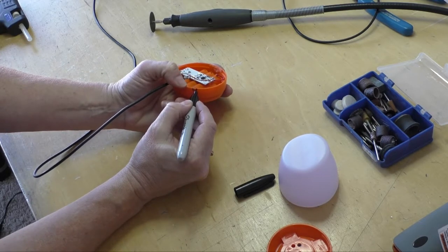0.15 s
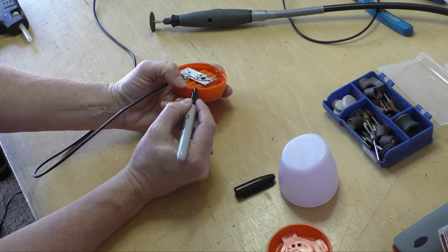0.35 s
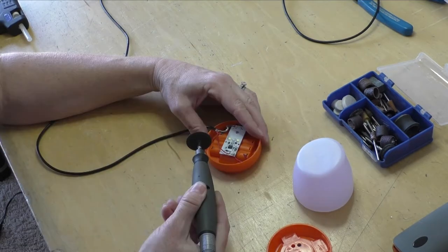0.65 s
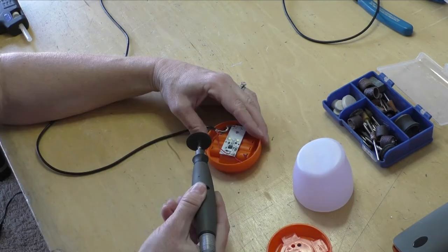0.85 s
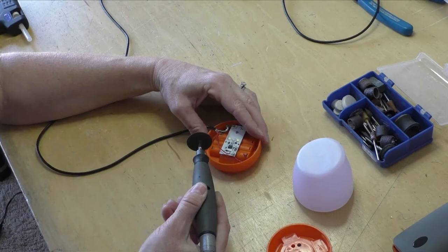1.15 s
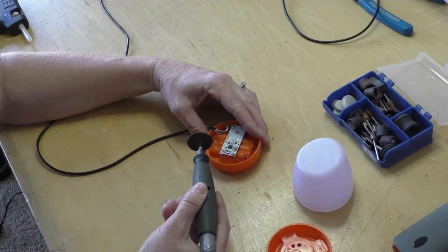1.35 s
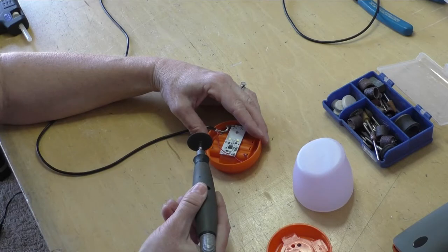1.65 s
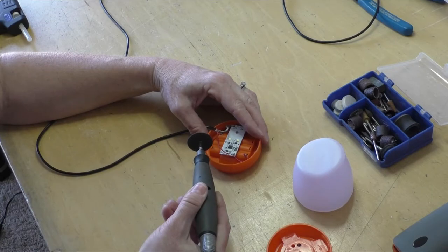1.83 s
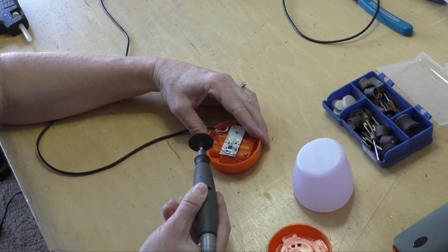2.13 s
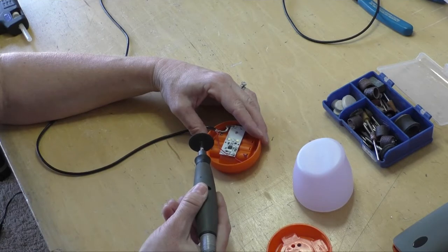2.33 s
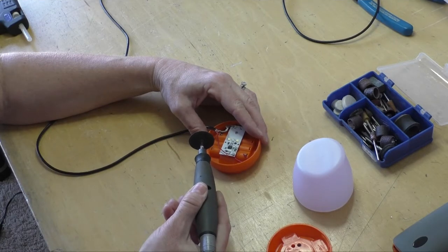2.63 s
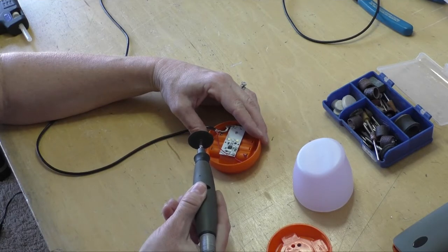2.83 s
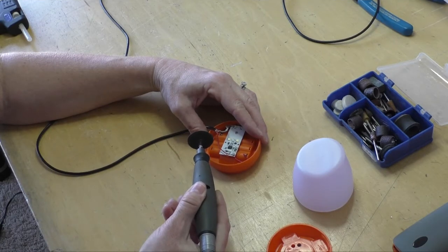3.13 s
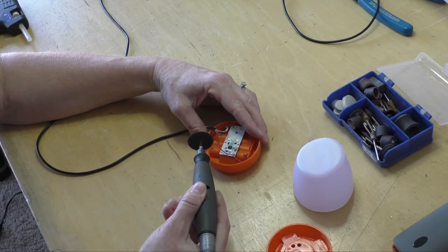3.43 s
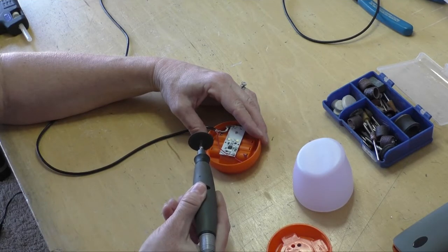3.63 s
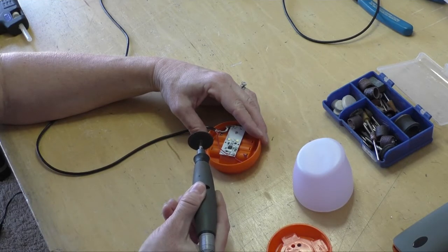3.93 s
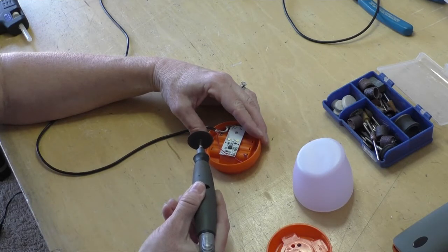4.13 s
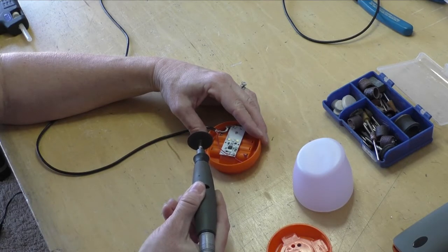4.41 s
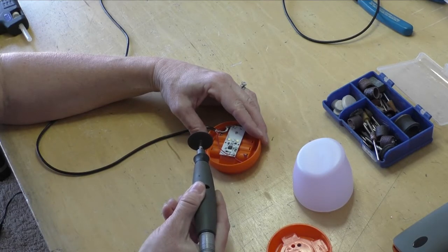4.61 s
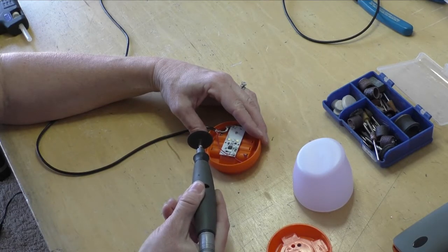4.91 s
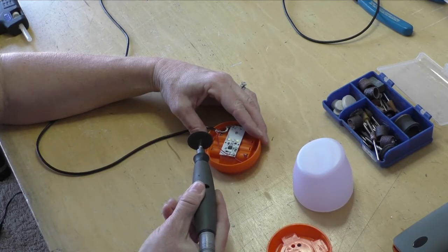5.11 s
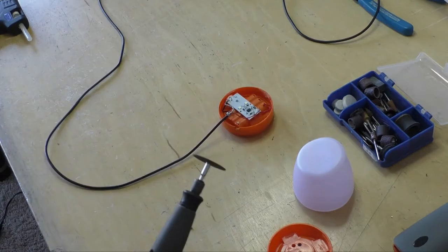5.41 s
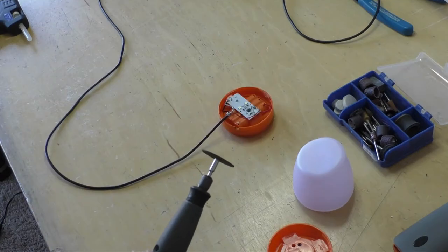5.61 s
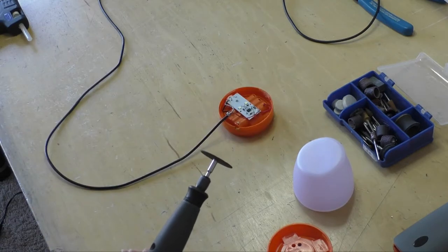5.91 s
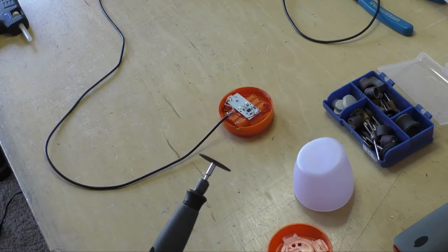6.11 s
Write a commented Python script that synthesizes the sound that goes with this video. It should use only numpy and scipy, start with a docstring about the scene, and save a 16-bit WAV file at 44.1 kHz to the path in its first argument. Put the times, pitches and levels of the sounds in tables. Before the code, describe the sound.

Heard close in a small, fairly dry workshop: low appliance hum and a faint felt-tip scrape, then a sudden jump to a rattling hand tool. Brief zips lead into a long, bright, rasping plastic cut dropping in pitch, followed by three short shrill bursts with the free-running whir between them. Finally a nearer buzzy motor whine runs briefly, is switched off, and falls quickly away.

```python
"""Rotary tool on a plastic bowl

A workbench in three abrupt sections: a marker drags over a plastic bowl in a humming room; a flex-shaft tool
runs free, touches the bowl briefly and takes four long cuts; its motor is heard closer, then switched off.
The off-centre disc scrapes once a turn with nearly repeating roughness, ringing modes of bowl and disc.
The tool is shaft-locked rattle, mains buzz and whine; the room is rumble, hiss and wavering hum lines."""
import sys
import numpy as np
from scipy import signal
from scipy.fft import rfft, irfft
from scipy.io import wavfile
from scipy.ndimage import uniform_filter1d, map_coordinates

SR = 44100
rng = np.random.default_rng(int(sys.argv[2]) if len(sys.argv) > 2 else 0)


def transcribe(u):
    """Save the signal u as a 16-bit wav file named by the first command-line argument.

    u: samples, shape (n,) or (channels, n), limited to [-1, 1]; the rate is SR.
    q: integer samples, one column per channel.
    """
    v = np.clip(np.atleast_2d(u).T, -1, 1)
    q = np.round(v * 32767).astype(np.int16)
    wavfile.write(sys.argv[1], SR, q)


N = 276066
TIME_S = np.arange(N) / SR
MAINS_HZ = 60.0
FREE_HZ, FREE_WAVER_HZ = 179.9, 0.4  # turns per second without load, and their waver
OFF_S, COAST_PER_S = 5.928, 3.1  # switch-off, and decay rate of the speed after it

# Parts of bowl and disc, from whole bowl, floor, low wall, lower and upper mid wall, high wall, rim,
# disc edge to disc: touch_db (share on first touch), sunk_db (share once sunk in),
# load_db (gain per third of the free speed lost)
PART_SHARES = [(-57, -59, 3), (-52, -50, -2), (-50, -47.5, 1.5), (-39, -43, -1), (-52, -41.5, 1.5),
               (-52.5, -45, 3.5), (-41.5, -41, -3.5), (-39.5, -43.5, -1.5), (-41, -46, -3)]
# Extra level of the treble ring: time_s, disc_edge_db, disc_db
TREBLE_RING = [(.75, 1.5, 0), (1.05, 3, 0), (1.28, -1.5, -3), (1.48, 1.5, 2), (1.7, 1.5, 7.5),
               (2.14, 2.5, -3), (2.31, 2, 6.5), (2.49, 3.5, -3), (3.45, 9.5, 6), (3.54, 1, -4),
               (3.8, -3, -4), (3.91, 6, 11), (4.43, 3, -3), (4.57, 1, -2), (4.68, 1, -1), (5.08, 0, -5),
               (5.2, -3, -7), (5.4, -2, -6)]
# The disc just brushing the bowl: time_s, level_db
GRAZES = [(3.1, -57), (3.198, -53), (3.3, -62), (3.386, -50), (4.007, -62), (4.039, -61), (4.064, -56),
          (4.12, -63), (4.325, -56), (4.835, -62), (4.905, -56)]
SHARE_WAVER_DB = 1.5


def cut(turns):
    """The high side of the disc scrapes once a turn; torn chips add fresh grit, mostly in the treble."""
    bite, depth = contact()
    # The more the shaft is dragged down, the more the plastic tears at random
    speed_hz = np.gradient(turns) * SR
    load = np.clip(1 - speed_hz / FREE_HZ, 0, 1 / 4)
    tearing = undb(-17 + 45 * load) * rng.standard_normal(N)
    worn = steady(repeating(turns, 30.0)) + tearing
    gritty = worn + undb(-15) * rng.standard_normal(N)
    body_band = signal.butter(2, [520.0, 7000.0], "band", fs=SR, output="sos")
    treble_band = signal.butter(2, 7000.0, "high", fs=SR, output="sos")
    dull = signal.sosfilt(body_band, worn)
    bright = signal.sosfilt(treble_band, gritty)

    # The bowl feels the disc all round; the thin disc sings mostly on its high side
    dull_scrape = dull * (undb(-3) + arc(turns, 3.4))
    bright_scrape = bright * (undb(-14) + arc(turns - 0.05, 3.2))
    parts = bowl(dull_scrape + bright_scrape)

    shares = []
    for touch_db, sunk_db, load_db in PART_SHARES:
        share_db = touch_db + (sunk_db - touch_db) * depth + 3 * load * load_db
        shares.append(undb(share_db + SHARE_WAVER_DB * walk(7)))
    shares = np.array(shares)
    shares[-2:] *= undb([curve(TREBLE_RING, column) for column in (1, 2)])
    shares /= np.sqrt((shares ** 2).sum(0))  # total power stays 1
    scrape = sum(steady(part, 0.12) * share for part, share in zip(parts, shares))

    graze = sum(undb(db) * np.exp(-((TIME_S - s) / 0.0051) ** 2) for s, db in GRAZES)
    brushed = steady(parts[5:8].sum(0))  # high wall, rim and disc edge
    return scrape * bite + brushed * graze


# Each contact of disc and bowl: start_s (full bite), end_s (let-off), rise_db_per_s, fall_db_per_s,
# sink_db (how far tool and room drop), sink_in_s (time constant of the disc sinking in)
CONTACTS = [(0.78, 0.782, 295, 201, 2, .4), (0.859, 0.857, 1500, 1600, 5, 0.27),
            (.98, 0.98, 496, 903, -9, 0.51), (1.02, 1.018, 1100, 1800, 0, .4),
            (1.051, 2.527, 1800, 650, 20.5, 0.21), (3.455, 3.926, 801, 900, 16.5, 0.013),
            (4.386, 4.709, 1500, 448, 16, 0.038), (5.07, 5.408, 1800, 900, 17, 0.056)]
# How hard the disc is pressed in: time_s, bite_db
PRESS = [(.78, -32), (.86, -37), (.98, -34.5), (1.02, -34.5), (1.048, -32.5), (1.144, -39.5), (1.17, -36.5),
         (1.49, -34), (1.73, -37), (1.78, -34), (2.14, -33), (2.21, -35.5), (2.4, -33), (2.45, -34),
         (2.49, -34), (2.52, -38.5), (3.47, -32.5), (3.58, -36), (3.66, -34.5), (3.92, -38), (4.39, -35),
         (4.53, -35), (4.63, -32.5), (4.71, -36), (5.08, -35), (5.14, -36.5), (5.23, -32.5), (5.4, -35.5)]
PRESS_WAVER_DB = 0.36


def contact():
    """Gain of the bite from hand pressure, and how deep the disc sits (0-1)."""
    gain, depth = 0, np.zeros(N)
    for start, end, rise, fall, _, sink_in_s in CONTACTS:
        # Pressure inside the contact, straight dB slopes on both sides
        press_db = np.interp(np.clip(TIME_S, start, end), *np.transpose(PRESS))
        slope_db = rise * np.clip(start - TIME_S, 0, 1) + fall * np.clip(TIME_S - end, 0, 1)
        gain = gain + undb(press_db - slope_db)
        sinking_in = 1 - np.exp(-np.clip(TIME_S - start, 0, None) / sink_in_s)
        depth = np.where(TIME_S > start, sinking_in, depth * (TIME_S < start - 0.05))
    return gain * undb(PRESS_WAVER_DB * walk(14)) * by_section((0, 1, 0)), depth


# Modes of bowl and disc: centre_hz, width_hz (of each of two filter passes), level_db
BOWL_MODES = [(576, 366, -10.5), (734, 176, -10.5), (1136, 132, 1.5), (1548, 180, 4), (1850, 72, 5.5),
              (2537, 444, -3), (3143, 440, -3), (3742, 390, 6), (4652, 270, 3.5), (5230, 60, -5.5),
              (6176, 880, -2), (6780, 180, -4.5), (7670, 220, -3), (8230, 530, 0.5), (9070, 320, 1.5),
              (10010, 1080, -5), (10950, 70, -2), (11960, 390, -9.5), (12700, 90, -5), (13300, 510, -15),
              (14300, 1100, -1), (15100, 610, -6.5)]
# Upper limits of all parts but the last: top_hz
PART_TOPS = (900, 2100, 2900, 3500, 4250, 5400, 7300, 13000)


def bowl(x):
    """The ringing modes, summed part by part from the whole bowl up to the disc."""
    parts = np.zeros((len(PART_TOPS) + 1, len(x)))
    for hz, width_hz, db in BOWL_MODES:
        parts[np.searchsorted(PART_TOPS, hz)] += undb(db) * ring(x, hz, width_hz)
    return parts


def repeating(turns, memory, count=256):
    """Roughness fixed around the shaft, wearing into a new pattern over `memory` turns."""
    keep = np.exp(-1 / memory)
    # One row per turn, each point leaning on the same point of the turn before
    rows = signal.lfilter([1], [1, -keep], rng.standard_normal((1400, count)), axis=0).ravel()
    return map_coordinates(rows, [(turns + 200) * count], order=3)  # skip the build-up


def arc(turns, sharp):
    """A bump once per turn, peaking at 1."""
    return np.exp(sharp * (np.cos(2 * np.pi * turns) - 1))


# Shaft speed in the first two sections: time_s, speed_hz (turns per second)
SHAFT_SPEED = [(0.58, 174), (0.85, 177.4), (1.0, 176.3), (1.22, 178.7), (1.45, 173.5), (1.86, 161.2),
               (2.35, 145), (2.5, 140.9), (2.64, 154.2), (2.89, 163), (3.15, 171.2), (3.47, 173.7),
               (3.73, 165.8), (3.88, 163.5), (4.09, 169.2), (4.35, 174.7), (4.45, 173.1), (4.56, 169.3),
               (4.72, 161.2), (4.99, 170.3), (5.1, 171.5), (5.22, 168.8), (5.41, 161.8)]


def shaft():
    """Turns of the shaft so far: the drawn speed, then free running that decays after switch-off."""
    free_hz = FREE_HZ + FREE_WAVER_HZ * walk(5)
    coasting_hz = free_hz * np.exp(-COAST_PER_S * np.clip(TIME_S - OFF_S, 0, None))
    return np.cumsum(np.where(TIME_S < SECTION_STARTS[1], curve(SHAFT_SPEED), coasting_hz)) / SR


# Tool level by section: level_db
TOOL_LEVELS = (-99, -40, -41.5)
FADE_DB, FADE_POWER = 108, 1.6  # fall one second after switch-off, and how late it comes


def tool(turns, sunk_db):
    """Shaft-locked rattle and mains buzz, with bench wobble in section two and motor whine in three."""
    half_cycles = 2 * MAINS_HZ * TIME_S
    powered = np.clip((OFF_S - TIME_S) / 0.021, 0, 1)
    near_motor = TIME_S > SECTION_STARTS[1]
    on_bench = (TIME_S > SECTION_STARTS[0]) & (TIME_S < SECTION_STARTS[1])
    close = motor(turns, half_cycles, powered)
    hand = handpiece(turns, half_cycles)
    fade_db = FADE_DB * np.clip(TIME_S - OFF_S, 0, 1) ** FADE_POWER
    level_db = by_section(TOOL_LEVELS) - sunk_db - fade_db + 1.1 * walk(15)
    noise = np.where(TIME_S < SECTION_STARTS[1], steady(hand), steady(close)) * undb(level_db)
    whining = whine(turns, half_cycles) * powered * near_motor
    return noise + np.sqrt(2) * (whining + wobble(turns, sunk_db) * on_bench)


# Handpiece spectrum: frequency_hz, density_db (dB per Hz, relative)
HANDPIECE_COLOUR = [(120, -39), (300, -19.5), (550, -20.5), (1100, -9.5), (1600, -9.5), (2200, -2),
                    (2800, -2), (3150, -10.5), (4500, -13.5), (6200, -18), (7000, -22), (10000, -25),
                    (15800, -30.5)]


def handpiece(turns, half_cycles):
    """Handpiece and flex shaft rattle nearly alike each turn, swelling with each mains half-cycle."""
    rattle = steady(repeating(turns, 20.7)) + undb(2) * rng.standard_normal(N)
    return colour(rattle * (1 + 0.5 * arc(half_cycles, 3.1)), HANDPIECE_COLOUR)


# Motor spectrum: frequency_hz, density_db (dB per Hz, relative)
MOTOR_COLOUR = [(150, -42), (400, -19.5), (750, -15), (1050, -7), (1600, -6.5), (2200, -8), (2700, -3.5),
                (3750, -3), (4050, -8.5), (4600, -7.5), (5000, -15), (6200, -16), (10800, -18.5),
                (15800, -25)]
# Tones of the brushes over the segments: multiple of the shaft speed
BRUSH_TONES = (24, 32, 48, 64)


def motor(turns, half_cycles, powered):
    """Rattle buzzing with brush sparks; after power-off the brushes sing down through housing resonances."""
    rattle = steady(repeating(turns, 8.8))
    # Sparks differ from one half-cycle to the next
    spark_gain = undb(2.07 * rng.standard_normal(800))[half_cycles.astype(int)]
    spark = spark_gain * arc(half_cycles, 17.5)
    sing = sum(undb(-11 + 5 * walk(40)) * np.sin(2 * np.pi * k * turns) for k in BRUSH_TONES)
    sing = (ring(sing, 2950.0, 1710.0) + ring(sing, 4900.0, 700.0)) * (1 - powered)
    rough = rattle + undb(4.0) * rng.standard_normal(N)
    buzz = 1 + 0.68 * spark * (0.17 + 0.21 * powered)
    return colour(sing + rough * buzz, MOTOR_COLOUR)


# Commutator whine lines: shaft_multiple, sideband (steps of the mains half-cycle rate)
WHINE_LINES = [(16, -2), (16, -1), (16, 0), (16, 1), (16, 2), (16, 3), (8, 0), (9, 0), (64, 0), (72, 0),
               (80, 0)]
# Level of each whine line: level_db
WHINE_LEVELS = [-53, -57, -53, -48.5, -51, -51, -64, -63, -61, -72, -70]


def whine(turns, half_cycles):
    """Commutator tones at shaft multiples, with sidebands spaced by the mains half-cycle rate."""
    out = np.zeros(N)
    for (multiple, sideband), db in zip(WHINE_LINES, WHINE_LEVELS):
        cycles = multiple * turns + sideband * half_cycles + 1 / 4
        out += undb(db + 1.5 * walk(10)) * np.sin(2 * np.pi * cycles)
    return out


# The bench's answer to the shaft's unbalance: frequency_hz, level_db
BENCH_RESPONSE = [(140, -61), (157, -49.5), (175, -66.5), (290, -57), (320, -65.5), (350, -68), (425, -48),
                  (445, -52), (485, -61.5), (500, -66.5), (530, -74)]


def wobble(turns, sunk_db):
    """Shaft unbalance and its multiples, each as loud as the bench answers at that pitch."""
    out = np.zeros(N)
    for k in (1, 2, 3):
        pitch_hz = k * np.gradient(turns) * SR
        bench_db = np.interp(pitch_hz, *np.transpose(BENCH_RESPONSE))
        out += undb(bench_db - sunk_db + 2.3 * walk(12)) * np.sin(2 * np.pi * k * turns)
    return out


# Level of the marker stroke: time_s, level_db
MARKER_STROKE = [(.09, -75), (.11, -59.5), (.2, -58.5), (.235, -67), (.28, -57), (.325, -57), (.36, -51),
                 (.377, -41.5), (.392, -62), (.4, -70)]
# How the felt tip drives each part, whole bowl to disc: level_db
TIP_DRIVE = [-23, -13, -11, -3, 0, -8, 2, -2, -8]


def marker():
    """The felt tip drags in tiny slips that ring the bowl, then ticks as it lifts off."""
    slips = (rng.standard_normal(N) * undb(2.5 * walk(152.8)))[:SR]
    rung = steady(sum(steady(part) * undb(db) for part, db in zip(bowl(slips), TIP_DRIVE)))
    return np.pad(rung, (0, N - SR)) * undb(curve(MARKER_STROKE, out=-200))


# A hand shifting on the bench: start_s, level_db, pitch_hz
HAND_THUDS = [(3.42, -56, 85.7), (3.5, -64, 82), (3.64, -65, 89)]


def thuds():
    """Soft pushes into the bench top: low sines that swell and die in tens of milliseconds."""
    out = np.zeros(N)
    for start_s, db, hz in HAND_THUDS:
        t = np.clip(TIME_S - start_s, 0, None)
        out += undb(db) * np.sin(2 * np.pi * hz * t) * (t / 0.022) * np.exp(1 - t / 0.019)
    return out


# Room spectrum: frequency_hz, density_db (dB per Hz, relative)
ROOM_COLOUR = [(15, -40), (25, -12.5), (133, -4), (316, -14), (382, -13.5), (857, -21), (1510, -28),
               (1780, -27), (2200, -30.5), (3490, -31.5), (4330, -37.5), (6850, -40), (15800, -42)]
# Hum lines: pitch_hz, level_db (relative, lifted by 48 dB in the mix)
HUM_LINES = [(60, -48.5), (120, -47), (145.3, -63), (180, -58), (248, -59), (382, -62), (850, -62.5)]
# Room level by section: level_db
ROOM_LEVELS = (-41, -60.5, -65.5)


def room(sunk_db):
    """Appliance rumble with wavering hum lines over a faint hiss."""
    hum = np.zeros(N)
    for hz, db in HUM_LINES:
        hum += undb(db + 2 * walk(13)) * np.sin(2 * np.pi * (hz * TIME_S + rng.random()))
    rumble = steady(colour(rng.standard_normal(N), ROOM_COLOUR))
    return steady(rumble + undb(48.0) * hum) * undb(by_section(ROOM_LEVELS) - sunk_db)


SINK_S, CREEP_DB_PER_S = 0.11, 14.5  # time constant of the drop, and speed of the return


def sinking(count=200):
    """dB by which tool and room lie under their free level: drawn down in a cut, creeping up between."""
    times, sunk = np.arange(0, N / SR, 1 / count), [0.0]
    for s in times[1:]:
        pull = [row[4] for row in CONTACTS if row[0] <= s < row[1]]
        if pull:
            sunk.append(sunk[-1] + (pull[0] - sunk[-1]) / (1 + SINK_S * count))
        else:
            sunk.append(max(sunk[-1] - CREEP_DB_PER_S / count, 0))
    return curve(np.transpose([times, sunk])) * by_section((0, 1, 0))


# Where the second and third sections cut in: start_s
SECTION_STARTS = (.574, 5.415)


def by_section(values):
    """One value for each section, at every sample."""
    return np.array(values)[np.searchsorted(SECTION_STARTS, TIME_S)]


def undb(db):
    """Decibels to amplitude."""
    return 10 ** (np.asarray(db) / 20)


def curve(rows, column=1, out=None):
    """A table column at every sample, on straight lines between its times."""
    rows = np.array(rows)
    return np.interp(TIME_S, rows[:, 0], rows[:, column], left=out, right=out)


def steady(x, span_s=20):
    """Level x to an rms near 1 over a sliding span."""
    return x / np.sqrt(uniform_filter1d(x ** 2, int(span_s * SR), mode="reflect") + 1e-18)


def colour(x, points):
    """Shape the spectrum of x by (Hz, dB) points on a log frequency axis."""
    hz, db = np.transpose(points)
    bins_hz = np.arange(N // 2 + 1) * SR / N + 1  # 1 Hz up, to keep the log finite
    return irfft(rfft(x) * undb(np.interp(np.log(bins_hz), np.log(hz), db)), N)


def ring(x, hz, width_hz):
    """One steep resonance: two passes of a peak filter, gain 1 at its centre."""
    b, a = signal.iirpeak(hz, hz / width_hz, SR)
    return signal.lfilter(b, a, signal.lfilter(b, a, x))


def walk(rate):
    """Slewed random levels, `rate` new ones a second; spread near 1."""
    k = int(SR / rate)
    return uniform_filter1d(np.repeat(rng.standard_normal(N // k + 1), k), k)[:N]


def reverb(near):
    """The cut hangs briefly in the room, duller than the direct sound."""
    tail_s = np.arange(int(0.3 * SR)) / SR
    tail = rng.standard_normal(len(tail_s)) * np.exp(-np.log(1000) * tail_s / 0.16)  # -60 dB in 0.16 s
    wet = undb(-34) * signal.fftconvolve(ring(near, 4130.0, 9600.0), tail)[:N]
    return wet * (TIME_S < SECTION_STARTS[1])


def scene():
    """All sources on one shaft motion, summed to one channel."""
    turns = shaft()
    near, sunk_db = cut(turns), sinking()
    mix = near + reverb(near) + tool(turns, sunk_db) + room(sunk_db) + marker() + thuds()
    return mix[None]


def record(dry):
    """The microphone chain cuts the top above 15.8 kHz."""
    return signal.sosfilt(signal.ellip(10, 0.2, 80, 15800, fs=SR, output="sos"), dry)


dry = scene()
out = record(dry)
transcribe(out)
```